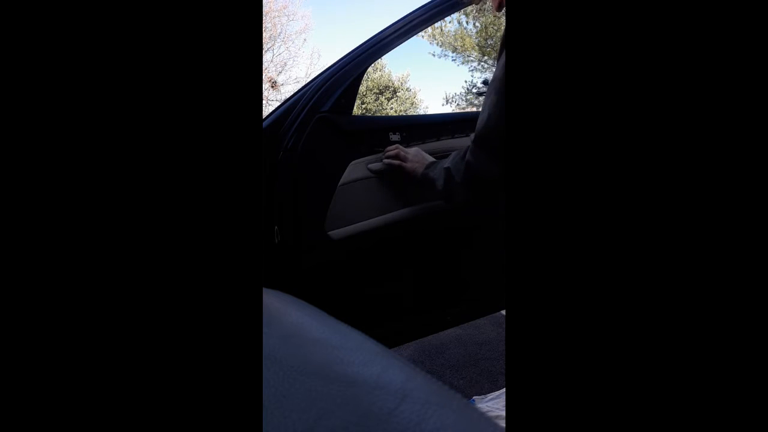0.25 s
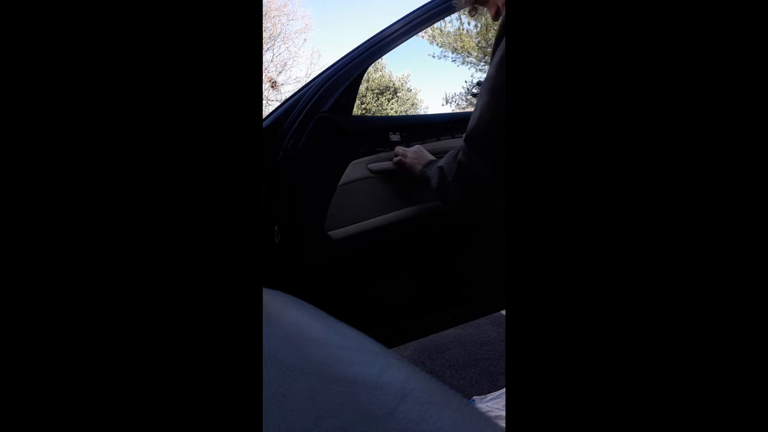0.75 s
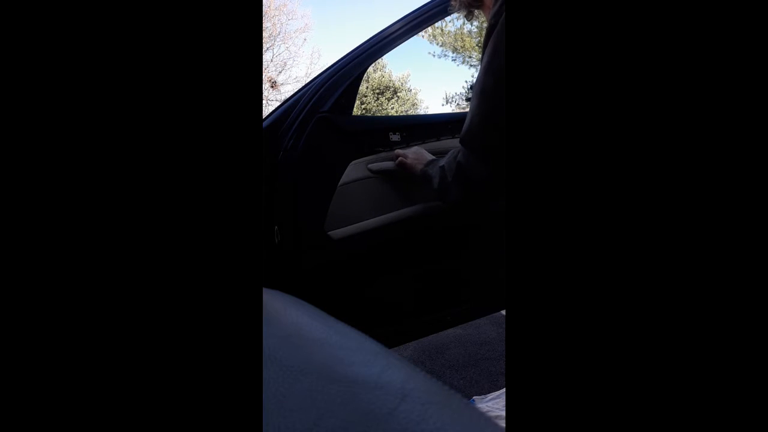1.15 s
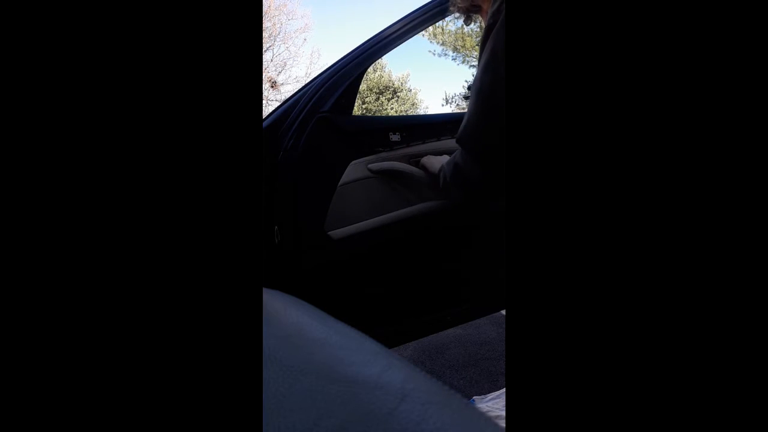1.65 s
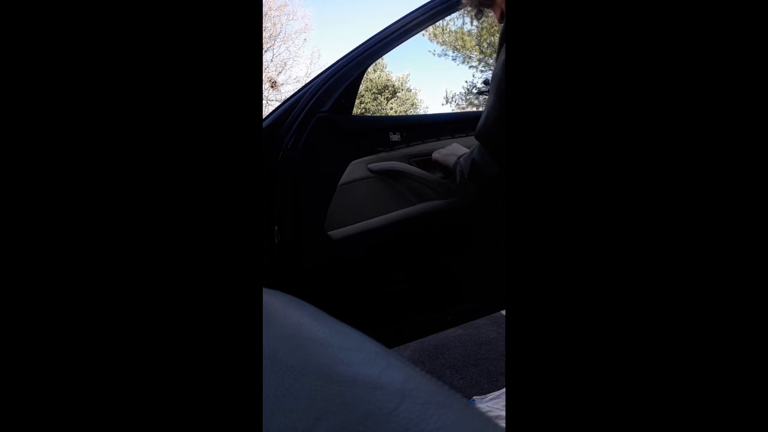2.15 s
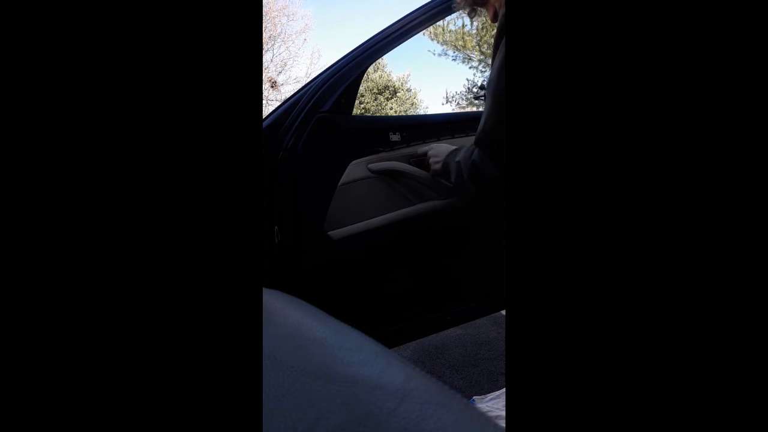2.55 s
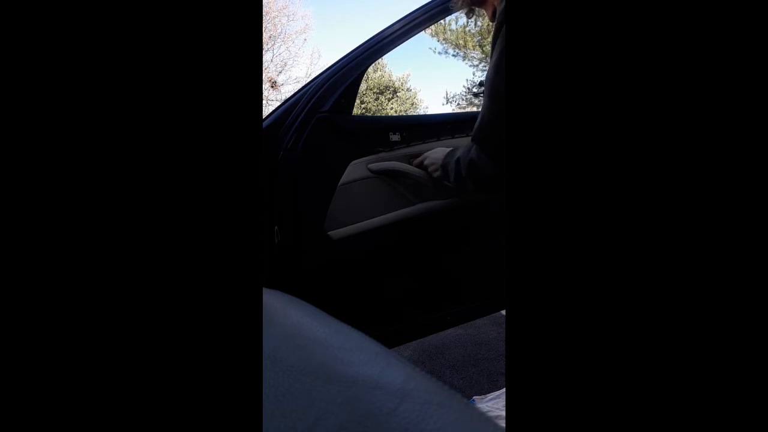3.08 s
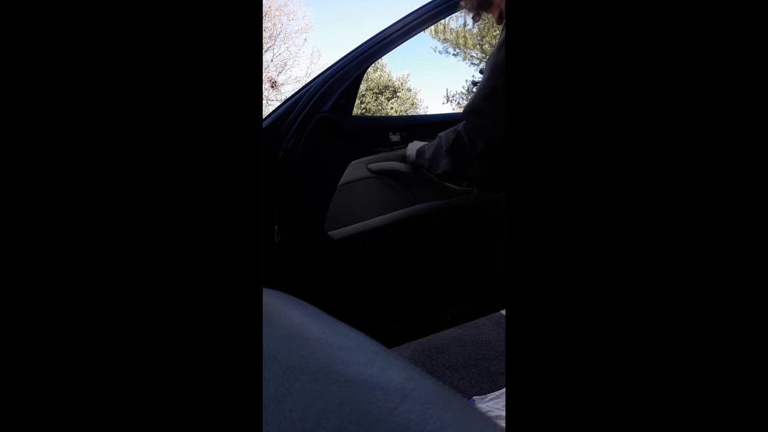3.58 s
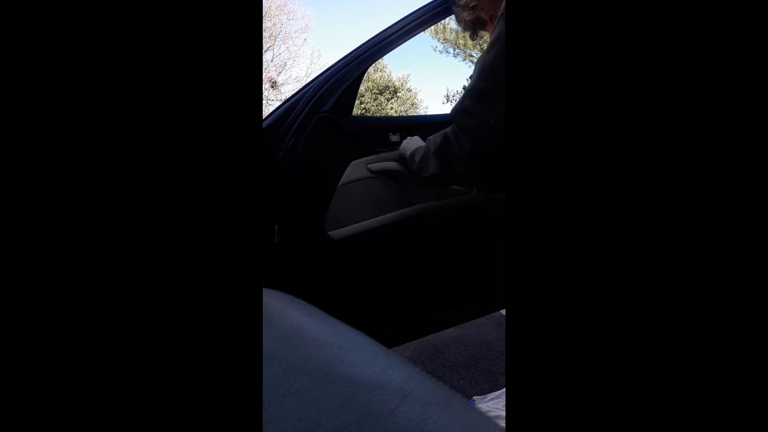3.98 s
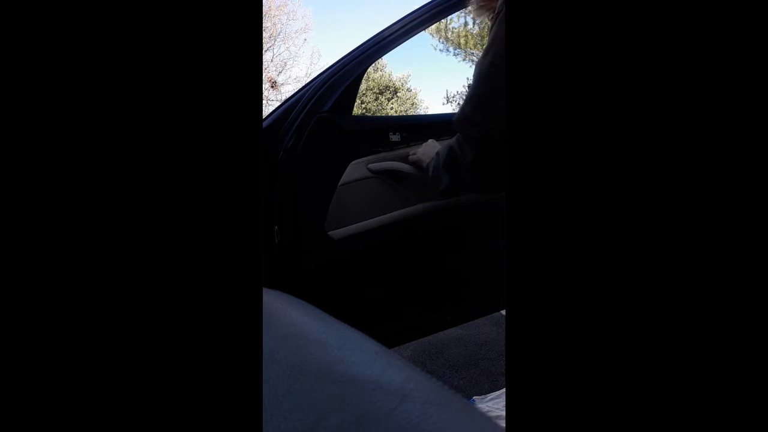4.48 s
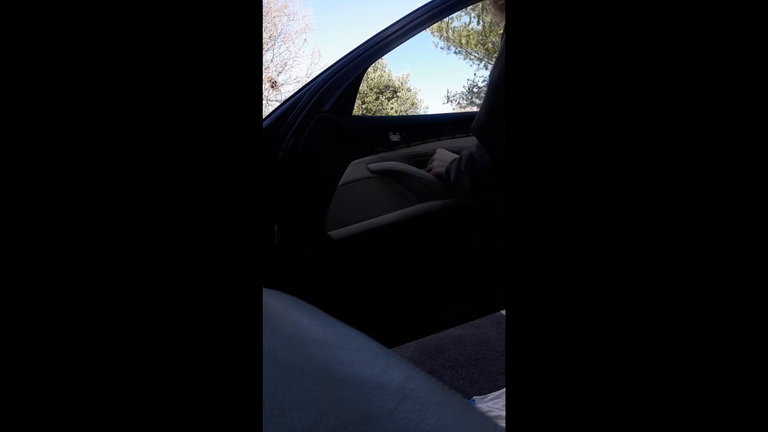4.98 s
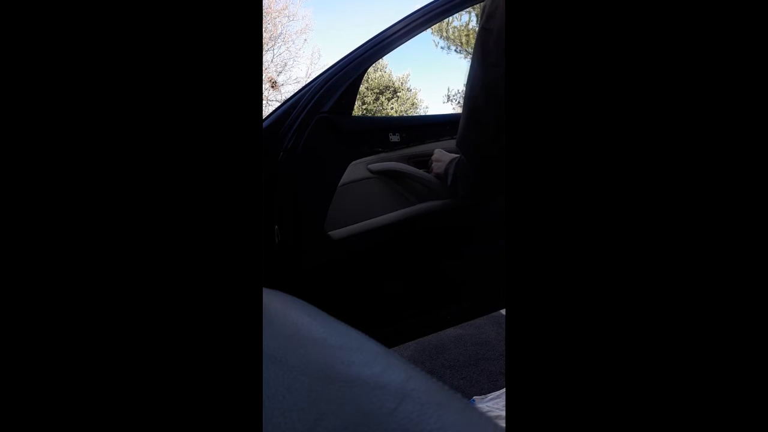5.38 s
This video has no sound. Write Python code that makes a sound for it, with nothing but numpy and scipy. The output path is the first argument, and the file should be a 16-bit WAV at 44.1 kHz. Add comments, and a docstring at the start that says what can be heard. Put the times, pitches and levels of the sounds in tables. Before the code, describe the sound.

Door handle handling in a small, dead car cabin: faint rubs and soft palm bumps, a quickening cluster of fingertip taps, a hard multi-part clack, two tiny dry ticks right at the microphone, sparse taps, then two further spaced snaps and quiet fumbling. Faint outdoor hum, rush and hiss continue below, dipping toward the end. Phone stereo pickup from the seat, with the ticks on the right.

```python
"""A hand on a car door.

Inside a parked car a hand pulls and releases the door handle and touches the plastic door panel.
Three loud snaps and many small taps, brushes and bumps are bursts of noise: their treble fills the
padded cabin and their push rings the panel, and both die fast. Below lie a low outdoor hum, rush and
hiss made of shaped noise, and a faint low tone. A phone with two microphone ports lies on a seat;
two dry ticks sound on it."""
import sys
import numpy as np
from scipy import signal
from scipy.fft import rfft, irfft
from scipy.io import wavfile
from scipy.ndimage import uniform_filter1d

SR = 44100
rng = np.random.default_rng(int(sys.argv[2]) if len(sys.argv) > 2 else 0)


def to_wav(sig):
    """Store sig (one row per channel, or 1-D mono) as 16-bit WAV at the path in sys.argv[1].

    Samples outside -1..1 are clipped; the rate is SR.
    """
    pcm = np.clip(np.atleast_2d(sig), -1, 1) * 32767
    pcm = np.round(pcm).astype(np.int16)
    wavfile.write(sys.argv[1], SR, pcm.T)  # frames by channels


N = 248283


def amp(db):
    """Turns decibels into gain."""
    return 10 ** (np.asarray(db) / 20)


def evened(x):
    """Scales to unit rms."""
    return x / np.sqrt(np.mean(x ** 2) + 1e-20)


def peaked(x):
    """Scales so that the loudest 3 ms of the first row have the level of a unit sine."""
    loudest_power = uniform_filter1d(x[0] ** 2, size=130).max()
    return x / np.sqrt(2 * loudest_power + 1e-20)


def read(points, hz):
    """Reads a table between its points, along log frequency."""
    f, value = np.transpose(points)
    return np.interp(np.log(hz + 1), np.log(f + 1), value)


def add(mix, s, sound):
    """Mixes a sound in at a time in seconds, cut at the end of the mix."""
    part = mix[:, round(s * SR):][:, :sound.shape[1]]
    part += sound[:, :part.shape[1]]


def causal(db):
    """Turns a dB curve on 1025 bins into a short click that starts at once (minimum phase)."""
    both_sides = np.r_[db, db[-2:0:-1]]
    log_gain = np.log(amp(np.maximum(both_sides, -100)))
    return np.fft.ifft(np.exp(np.conj(signal.hilbert(log_gain)))).real[:1024]


def noise(spectrum, patchy_db, size):
    """Two unrelated noises of unit rms, built from random short-time spectra with drifting patches."""
    frames, hz = N // (size // 4) + 5, np.fft.rfftfreq(size, 1 / SR)
    z = rng.standard_normal((frames, len(hz), 5)).T
    patches = uniform_filter1d(z[4], size=12, axis=0)
    patches = evened(uniform_filter1d(patches, size=10, axis=1))
    gain = amp(read(spectrum, hz)[:, None] + patchy_db * patches)
    spectra = (z[:2] + 1j * z[2:4]) * gain
    return evened(signal.istft(spectra, nperseg=size, noverlap=size * 3 // 4)[1][:, :N])


PORT_LEAD_S = .00048  # full lead of the left port at high pitch; each source takes a share of it

# How the two ports differ in tone. Each row: frequency in Hz, left minus right in dB.
TILT = [(60, 0), (130, -1.5), (290, -1.5), (640, -3.5), (1410, -2), (3100, -6), (6820, -2.5),
        (15000, -12.5)]


def ports(pair, alike, lead_share):
    """Two renderings become left and right: left shares part of right, leads it and is duller."""
    hz = np.fft.rfftfreq(N, 1 / SR)
    one, other = rfft(pair, axis=1)
    same = np.clip(read(alike, hz), 0, 1)
    half_db = read(TILT, hz) / 2
    # the long waves of the bass arrive almost together
    lead = 2 * np.pi * hz * PORT_LEAD_S * hz ** 2 / (hz ** 2 + 970.0 ** 2)
    left = same * one + np.sqrt(1 - same ** 2) * other
    left = left * np.exp(1j * lead_share * lead)
    return irfft([left * amp(half_db), one / amp(half_db)], N, axis=1)


DRONE_HZ, DRONE_DB, DRONE_WAVER_HZ = 50.7, -66.5, .8  # middle pitch, rms level at first, rms waver
DRONE_FADE_S, DRONE_LOW_S = 3.3, 4.4  # it sinks by 25 dB between these times


def drone():
    """A soft low sine whose pitch wanders slowly."""
    wander = evened(uniform_filter1d(rng.standard_normal(N), size=12000))
    level_db = DRONE_DB + np.interp(np.arange(N) / SR, [DRONE_FADE_S, DRONE_LOW_S], [0, -25])
    cycles = np.cumsum(DRONE_HZ + DRONE_WAVER_HZ * wander) / SR
    return amp(level_db) * np.sqrt(2) * np.sin(2 * np.pi * cycles)


RUSH_OVER_HISS_DB = 1.28

# The tone of the hum, the rush and the hiss.
# Each row: frequency in Hz, relative strength in dB per Hz.
HUM = [(18, -48), (40, -32.5), (58, -21), (78, -2), (102, 0.5), (150, -1), (204, -10.5), (241, -1),
       (284, 0.5), (347, -9), (377, -15.5), (409, -13.5), (500, -19), (650, -53), (1100, -120)]
RUSH = [(240, -28.5), (400, -12.5), (534, -12), (601, -6.5), (977, -1.5), (1080, -1), (1260, -5.5),
        (1410, -3), (2600, -16), (3380, -24.5), (5720, -120)]
HISS = [(1800, -39), (2500, -12.5), (3400, -7.5), (4200, -4.5), (5100, -5), (6100, -0.5), (6900, -5.5),
        (7400, -18.5), (9000, -18), (10500, -13), (12600, -6.5), (14500, -15.5), (15700, -22),
        (16500, -47.5)]
# The outside air, which sinks for a second late on.
# Each row: time in seconds, hum level in dB, hiss level in dB, both before the ports.
AIR = [(0.0, -51, -56), (0.7, -50, -55), (1.6, -48, -54.5), (2.15, -48, -58), (2.95, -51, -55.5),
       (3.65, -53.5, -56.5), (4.0, -51.5, -55.5), (4.329, -58.5, -63.5), (4.75, -62, -66),
       (5.02, -61, -68.5), (5.49, -53.5, -59), (5.63, -56, -59)]
# How alike the air is at the two ports. Each row: frequency in Hz, likeness from 0 to 1.
ALIKE_AIR = [(40, 0.99), (150, .99), (500, 0.89), (1200, 0.41), (5000, 0.14), (15000, 0.13)]


def air():
    """Hum, rush and hiss from outside are shaped noises; the rush rises and falls with the hiss."""
    s, hum_db, hiss_db = np.transpose(AIR)
    t = np.arange(N) / SR
    hum = amp(np.interp(t, s, hum_db)) * noise(HUM, 1.5, size=2048)
    rush = amp(RUSH_OVER_HISS_DB) * noise(RUSH, 0.84, size=1024)
    hiss = noise(HISS, 1.1, size=512)
    upper = amp(np.interp(t, s, hiss_db)) * (rush + hiss)
    return ports(hum + drone() + upper, ALIKE_AIR, 0.99)


# How fast the padded cabin swallows sound.
# Each row: frequency in Hz, time to fall by 60 dB in seconds.
CABIN = [(1000, 0.14), (5000, 0.074), (9000, 0.079), (15000, 0.045)]


def cabin():
    """Dense reflections of random sign and size, each band dying at its own speed."""
    echoes = rng.standard_normal((2, 8192)) * (rng.random((2, 8192)) < .3)
    hz, t, z = signal.stft(echoes, SR, nperseg=64)
    fade = amp(-60 * t / read(CABIN, hz)[:, None])
    tail = signal.istft(z * fade, SR, nperseg=64)[1]
    # the reflections build up over the first 0.43 ms
    return tail * np.minimum(np.arange(tail.shape[1]) / SR / 0.00043, 1)


TICK_LEFT_DB = -28  # the left port hears the tick this much weaker

# The tone of a bare tick. Each row: frequency in Hz, relative strength in dB per Hz.
TICK = [(500, -20), (1500, -5), (3500, 1), (6000, 8), (7200, -4), (8500, -28), (12500, 3), (16000, -14)]


def tick():
    """One bare click, shaped in tone and dying in about a millisecond, with a peak of 1 at the right."""
    click = causal(read(TICK, np.fft.rfftfreq(2048, 1 / SR)))
    click = click * np.exp(-np.arange(1024) / SR / 0.0013)
    return amp([[TICK_LEFT_DB], [0]]) * click / abs(click).max()


# Dry ticks on the phone beside its right port. Each row: start in seconds, peak in dB.
TICKS = [(1.7039, -17), (1.7685, -20.5)]


def phone_ticks():
    """Clicks on the phone itself, with no panel or cabin around them."""
    phone = np.zeros((2, N))
    for s, db in TICKS:
        add(phone, s, amp(db) * tick())
    return phone


# The tones that the door panel rings with.
# Each row: frequency in Hz, strength in dB, time for the slow part to fall by 60 dB in seconds.
PANEL = [(112.3, -1.5, 0.13), (171, -14.5, 0.099), (207.6, 7.5, 0.049), (262.7, 7.5, 0.075),
         (299.8, -3.5, 0.16), (314.6, 3.5, 0.04), (432.5, 2.5, 0.12), (479, 1, 0.092), (573, 6, 0.089),
         (658, 0.5, 0.1), (734, 3, 0.075), (771, 11, 0.05), (851, 6, 0.053), (914, -2.5, 0.12),
         (1048, 10.5, 0.031), (1134, -5.5, 0.071), (1264, -3, 0.11), (1415, 7, .05), (1514, 0, 0.042),
         (1558, -8, 0.046), (1564, 0, 0.091), (1904, -4.5, 0.11), (1976, 1.5, 0.079), (2117, -2.5, .05),
         (2320, -38, .05)]


def ring(low_hz, high_hz, centre_hz, octaves):
    """Panel tones in a range, strongest near a favoured pitch; the second row has random signs."""
    t = np.arange(8192) / SR
    hz, db, t60 = np.array([row for row in PANEL if low_hz < row[0] < high_hz]).T[:, :, None]
    # the hand damps most of the swing quickly; a remainder rings on
    decay = amp(-60 * t / (.35 * t60)) + 0.4 * amp(-60 * t / t60)
    strength = amp(db - 4 * (np.log2(hz / centre_hz) / octaves) ** 2)
    modes = strength * decay * np.sin(2 * np.pi * hz * t)
    signs = np.array([np.ones(len(hz)), rng.choice([-1., 1.], len(hz))])
    # the swing needs a moment to spread over the panel
    return signs @ modes * (1 - np.exp(-t * centre_hz / 1.03))


THUMP_HZ, THUMP_OCTAVES = 215, 1.1  # where the whole panel swings best, and how widely

# The tone of the crack of plastic. Each row: frequency in Hz, relative strength in dB per Hz.
CRACK = [(1180, -21.5), (2000, -13.5), (2920, -11.5), (3650, -2), (3950, -5), (4750, -4), (5770, -0.5),
         (6880, -3.5), (7520, -13.5), (9540, -12), (11000, -8), (13300, -0.5), (15500, -20.5), (16100, -33),
         (16500, -45.5)]


def touch(crack_db, knock_db, thump_db, knock_hz, octaves, contact_ms, tilt_db):
    """A short run of slips: its treble fills the cabin, its uneven push rings the panel."""
    t = np.arange(4096) / SR
    contact = max(contact_ms, 1) / 1000
    pressure = abs(np.sin(np.pi * np.minimum(t / contact, 1) ** .7))
    jumps = amp(1.3 * rng.exponential(1, len(t)))
    slips = rng.standard_normal((2, len(t))) * jumps * pressure

    hz = np.fft.rfftfreq(2048, 1 / SR)
    tone_db = read(CRACK, hz) + tilt_db * np.log2((hz + 100) / 5000)
    bright = signal.oaconvolve(slips[0], causal(tone_db))
    crack = signal.fftconvolve(bright[None], cabin(), axes=1)[:, :8192]

    # one firm blow early in the contact; it counts less in a long rub
    blow = np.exp(-((t - .37 * contact) / .00008) ** 2)
    firm = np.exp(-contact / 0.01) * blow / np.linalg.norm(blow)
    push = firm + 9 * np.sqrt(contact) * slips / np.linalg.norm(slips[0])
    knock_ring = ring(325, 3000, knock_hz, max(octaves, .2))
    knock = signal.fftconvolve(push, knock_ring, axes=1)[:, :8192]

    # the whole panel follows the hand more slowly
    shove = np.exp(-((t - np.minimum(0.25 * contact, .003)) / 0.0012) ** 2)
    thump_ring = ring(0, 325, THUMP_HZ, THUMP_OCTAVES)
    thump = signal.fftconvolve(shove[None], thump_ring, axes=1)[:, :8192]
    return amp(crack_db) * peaked(crack) + amp(knock_db) * peaked(knock) + amp(thump_db) * peaked(thump)


TAP_OCTAVES, TAP_TILT_DB, TAP_THUMP_DB = 0.46, -6, -30  # spread, dB per octave, thump under the knock
BUMP_KNOCK_DB, BUMP_CRACK_DB, BUMP_HZ, BUMP_MS = -15.5, -22, 460, 11.15  # levels are under the thump
BRUSH_KNOCK_DB, BRUSH_HZ = -9.5, 594  # knock and thump lie this far under the crack; knock pitch

# All levels in the next four tables hold before the bass cut of the door and the ports.
# Soft bumps of the palm that move the whole panel. Each row: start in seconds, thump peak in dB.
BUMPS = [(0.36, -42), (0.468, -41.5), (.842, -35.5), (1.184, -33), (1.797, -49), (2.698, -44),
         (3.767, -30.5), (3.793, -35.5), (4.539, -43.5), (5.506, -49), (5.555, -43)]


def palm_bumps(door):
    """Soft shoves in which the slow swing of the panel is loudest."""
    for s, db in BUMPS:
        crack_db, knock_db = db + BUMP_CRACK_DB, db + BUMP_KNOCK_DB
        add(door, s, touch(crack_db, knock_db, db, BUMP_HZ, TAP_OCTAVES, BUMP_MS, TAP_TILT_DB))


# Light brushes along the surface.
# Each row: start in seconds, crack peak in dB, length in ms, crack tilt in dB per octave.
BRUSHES = [(0.013, -46, 70, -1), (0.087, -43.5, 60, 1.5), (.466, -51, 41, 1), (.886, -43, 18, 1),
           (1.167, -35, 8.1, -5), (1.447, -42.5, 23, -5), (1.796, -42, 2.8, -8), (1.826, -41, 19, -8.5),
           (2.697, -50, 20.5, -2), (3.792, -51, 17, 3), (3.928, -48, 26, -3.5)]


def brushes(door):
    """Light slips that are mostly treble and ring the panel only a little."""
    for s, db, ms, tilt_db in BRUSHES:
        panel_db = db + BRUSH_KNOCK_DB
        add(door, s, touch(db, panel_db, panel_db, BRUSH_HZ, TAP_OCTAVES, ms, tilt_db))


# Fingertip taps on the plastic.
# Each row: start in seconds, knock peak in dB, crack peak in dB, knock pitch in Hz, contact in ms.
TAPS = [(0.619, -43.5, -35.5, 573, 27), (1.175, -46.5, -62, 554, 15.6), (1.26, -45.5, -44, 1710, 25),
        (1.291, -41.5, -47, 2040, 9.7), (1.324, -35.5, -43, 480, 5.8), (1.332, -36.5, -48, 610, 11),
        (1.402, -33, -43.5, 500, 4.8), (1.519, -37, -52.5, 2065, 6.35), (1.923, -41.5, -46, 1160, 17.3),
        (3.073, -39.5, -55, 870, 12.7), (3.367, -44, -45, 700, 15), (3.768, -47, -51, 673, 12),
        (4.168, -48, -53, 780, 5.4), (4.3535, -49.5, -44, 2210, 3.14), (4.436, -44.5, -46, 940, 3.8),
        (4.485, -49, -49, 1490, 28), (4.508, -47.5, -54, 1570, 26), (4.54, -48, -50, 1460, 12.5),
        (5.177, -50, -53.5, 1420, 3.1), (5.349, -49.5, -54.5, 1180, 3), (5.48, -52, -61, 1500, 4.6),
        (5.555, -45, -65, 483, 8.8)]


def fingertip_taps(door):
    """Small touches that ring the panel near a pitch of their own and barely shove it."""
    for s, db, crack_db, hz, ms in TAPS:
        add(door, s, touch(crack_db, db, db + TAP_THUMP_DB, hz, TAP_OCTAVES, ms, TAP_TILT_DB))


# Separate contacts inside the three loud handle snaps.
# Each row: start in seconds, crack peak in dB, knock peak in dB, thump peak in dB, knock pitch in Hz,
# knock spread in octaves (0.2 at least), contact in ms, crack tilt in dB per octave.
SNAPS = [(1.523, -19.5, -32, -25, 1300, 1.3, 8.1, -8.5), (1.538, -20, -18.5, -46, 1880, 0.52, 11, 2.5),
         (1.5459, -14.5, -10, -23, 820, 0.51, 7.05, -0.5), (1.554, -39, -22, -14, 610, 0.72, 7, -3),
         (3.413, -18, -20, -32, 1720, 0.48, 8.97, -5), (3.416, -12.5, -15.5, -9.5, 700, 1.1, 5.96, -12),
         (4.05, -46, -23, -32, 910, 1.2, 2.4, -1), (4.059, -9, -20, -34, 1790, 0.3, 5.5, 1.5),
         (4.069, -17, -21, -39, 1840, 0.19, 16.6, -1)]


def handle_snaps(door):
    """Each snap is a few hard contacts close together."""
    for s, *row in SNAPS:
        add(door, s, touch(*row))


SHORTED_HZ = 123  # below this the air slips round the panel

# How alike the door is at the two ports. Each row: frequency in Hz, likeness from 0 to 1.
ALIKE_DOOR = [(60, .99), (400, .97), (900, .85), (1600, .3), (15000, .3)]


def hand_on_door():
    """Bumps, brushes, taps and snaps all ring one panel, which radiates little deep bass."""
    door = np.zeros((2, N))
    palm_bumps(door)
    brushes(door)
    fingertip_taps(door)
    handle_snaps(door)
    bass_cut = signal.butter(4, SHORTED_HZ, "high", fs=SR, output="sos")
    return ports(signal.sosfilt(bass_cut, door), ALIKE_DOOR, 0.39)


def scene():
    """Outside air, the ticks on the phone and the hand on the door."""
    return air() + phone_ticks() + hand_on_door()


EDGE_HZ = 16620  # little passes above this


def record(dry):
    """Peaks above 0.7 bend softly towards a ceiling of 0.97, then the top treble is cut."""
    over = np.maximum(abs(dry) - .7, 0)
    held = dry - np.sign(dry) * (over - .27 * np.tanh(over / .27))
    band_limit = signal.firwin(255, EDGE_HZ, window=("kaiser", 9), fs=SR)
    return signal.oaconvolve(held, band_limit[None], "same")


dry = scene()
out = record(dry)
to_wav(out)
```